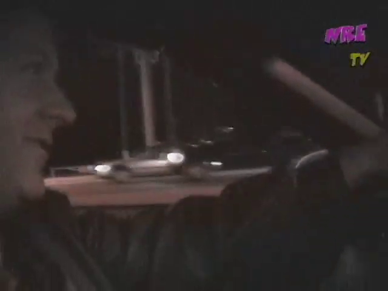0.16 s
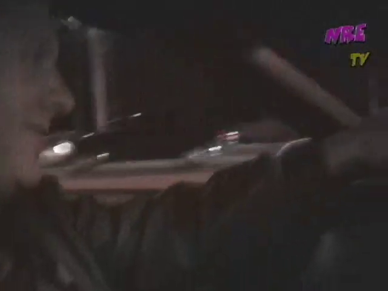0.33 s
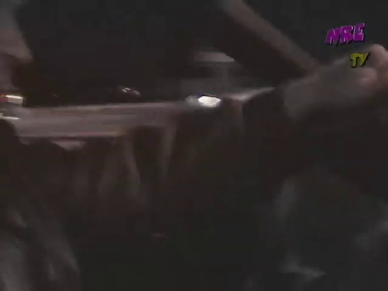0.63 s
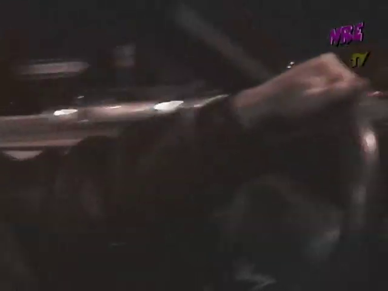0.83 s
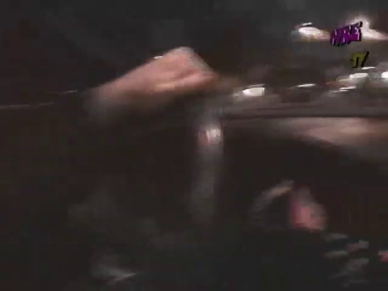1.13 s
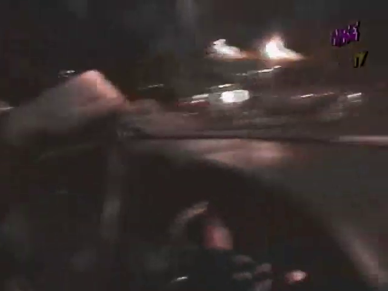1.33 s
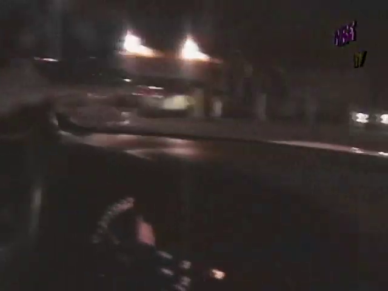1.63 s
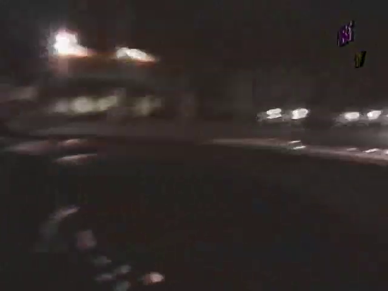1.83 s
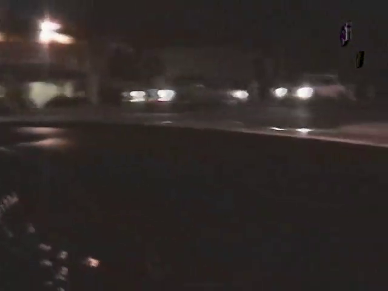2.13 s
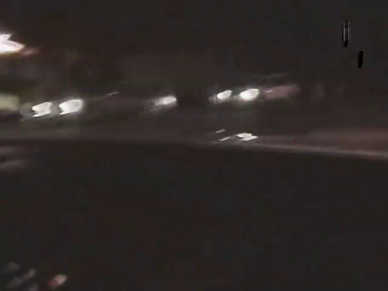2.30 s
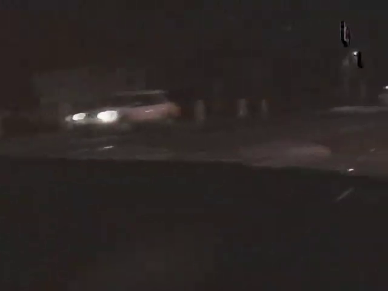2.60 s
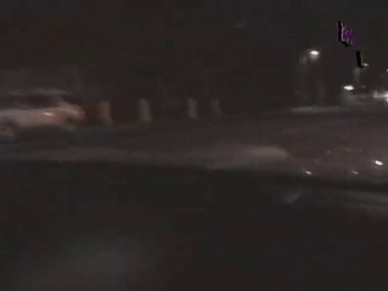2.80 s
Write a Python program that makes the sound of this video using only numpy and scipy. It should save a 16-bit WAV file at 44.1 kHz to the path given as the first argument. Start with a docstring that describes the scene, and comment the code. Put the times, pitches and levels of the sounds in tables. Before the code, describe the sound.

A powerful car engine booms inside the cabin, shuddering briefly, then climbing steadily under hard acceleration.

```python
"""The exhaust of a turbocharged V8 booms inside the cabin as the car pulls hard in one gear.
It is a sum of pure tones locked to the engine: a strong firing note over a lumpy beat of lower tones.
The revs sag and shudder as the drive takes up, then climb. Gear whine is made of tones that climb with them.
Shaped noise makes the intake rush and turbo air, which throb with the engine, and the steadier road noise.
Narrow bands of wavering tone make breathy whistles that come and go."""
import sys
import numpy as np
from scipy import signal
from scipy.fft import rfft, irfft, next_fast_len
from scipy.io import wavfile
from scipy.ndimage import uniform_filter1d, minimum_filter1d

SR = 44100
rng = np.random.default_rng(int(sys.argv[2]) if len(sys.argv) > 2 else 0)


def put_to_file(sound):
    """Save the sound as 16-bit audio at rate SR, in the file named by the first command-line argument."""
    columns = np.atleast_2d(sound).T  # one column per channel
    safe = np.clip(columns, -1, 1)
    whole_steps = np.round(safe * 32767)
    wavfile.write(sys.argv[1], SR, whole_steps.astype(np.int16))


N = 130095  # length in samples

# Engine speed, counted in cylinder firings: time_s, firing_hz
FIRING_SPEED = [(0.0, 151.7), (0.1, 149.7), (0.18, 142.1), (0.26, 122.7), (0.37, 134.3), (0.48, 133.3),
                (0.65, 136.7), (0.87, 143.7), (1.2, 153.8), (1.5, 163), (1.8, 172.4), (2.1, 180.4),
                (2.4, 190.4), (2.7, 197.5), (2.95, 203.3)]
CYLINDERS = 8
START_CYCLE = 0.72  # share of an engine cycle already done at the start
SPEED_JITTER, SPEED_JITTER_HZ = 0.00034, 13.8  # size as a share of speed, and how fast it moves
# How strongly the engine shudders while the drive takes up: time_s, amount (0 to 1)
SHUDDER = [(0, 1), (.2, 0.87), (.3, 0.24), (.45, 0), (.8, 0.02)]

# Exhaust tones, each a whole multiple of the engine cycle rate:
# multiple, level_db (at REFERENCE_HZ), slope_db_per_octave (of speed), shudder_db (added at full shudder)
EXHAUST_TONES = [(2, -30, 38, -7), (3, -33.5, 22.5, 19), (4, -18, 5, 6.5), (5, -19.5, 15, -12.5),
                 (6, -17, -3, 3), (7, -47, 19.5, 2), (8, -9, -12, -6), (9, -37, -21.5, 16.5),
                 (10, -31, -11, -43), (11, -40.5, -29, 6), (12, -45.5, -9, -13), (13, -33.5, 13.5, 1.5),
                 (14, -75, 2, -9), (15, -46.5, -31, 0), (17, -45.5, -34, 7), (21, -44, 23, -10),
                 (24, -48, -20, -13), (25, -42.5, 0, 10.5)]
REFERENCE_HZ = 160.6  # firing rate
# How the cabin colours the exhaust tones: pitch_hz, gain_db
CABIN = [(30, -8), (60, 2), (95, 0.5), (115, 4), (135, -0.5), (155, 2.5), (172, .5), (200, -3),
         (217, -12.5), (243, 5), (270, 0), (308, 5), (330, -2), (400, -4), (600, -4)]
BOOM_HZ, BOOM_WIDTH_HZ = 100, 40  # cabin resonance that shifts the timing of the tones
# Overall change to the exhaust tones, with one brief dip near the start: time_s, gain_db
EXHAUST_GAIN = [(0, -0.5), (.035, -0.5), (.07, -11.5), (.105, 2), (.135, -0.5), (.19, 1.5), (.3, -1),
                (.42, 1.4), (1, -1), (2, -.5), (2.95, 1.5)]
# The tone an octave above the firing note: time_s, level_db
OCTAVE_LEVEL = [(0, -39), (.6, -33.5), (.9, -44), (1.25, -31.5), (1.55, -25.5), (1.8, -38.5), (2.15, -43),
                (2.6, -35.5), (2.95, -35)]
# Uneven combustion: waver as a share of each tone, the extra at full shudder, and its rate
UNEVEN, SHUDDER_UNEVEN, UNEVEN_HZ = 0.097, 0.47, 27

# Gear whine tones, as multiples of the firing rate
LOW_WHINE_MULTIPLE, HIGH_WHINE_MULTIPLE, TOP_WHINE_MULTIPLE = 8, 24, 32
# Low whine: time_s, level_db
LOW_WHINE = [(0, -48), (.22, -41), (.45, -39.5), (.57, -40), (.78, -42), (.87, -30), (1.04, -37.5),
             (1.26, -26.5), (1.45, -31), (1.55, -43), (1.85, -40), (2.03, -36), (2.5, -36.5), (2.68, -52),
             (2.95, -39)]
# High whine: time_s, level_db
HIGH_WHINE = [(0, -66), (.6, -60), (.71, -49), (1.1, -45.5), (1.65, -49), (1.82, -38.5), (1.95, -34),
              (2.14, -44), (2.4, -42), (2.52, -36), (2.69, -35), (2.8, -41.5), (2.95, -47)]
TOP_WHINE_DB = -61
WHINE_FLUTTER, WHINE_FLUTTER_HZ = 0.37, 45  # share of the loudness, and its rate
WHINE_WANDER_RAD = 0.89  # phase wander of the high whine

# Intake rush before INTAKE_DB is added: time_s, level_db
INTAKE_LEVEL = [(0, -40.5), (.16, -38), (.22, -36), (.3, -43.5), (.43, -37.5), (.75, -39), (1.08, -36.5),
                (1.3, -34), (1.56, -31), (1.9, -32), (2.2, -34), (2.66, -33.5), (2.95, -31)]
# Turbo air before TURBO_DB is added: time_s, level_db
TURBO_LEVEL = [(0, -57), (.22, -54.5), (.31, -61), (.43, -54.5), (.6, -56.5), (1.1, -55.5), (1.54, -53),
               (2.2, -52), (2.95, -50)]
INTAKE_DB, TURBO_DB = 3, 10
# Tone colour of the intake rush: pitch_hz, relative_level_db (per Hz)
INTAKE_SPECTRUM = [(600, -19), (920, -17.5), (1020, -3), (1300, 1.5), (1600, -1.5), (2100, -1.5),
                   (2500, -5), (2900, -10.5), (3600, -20.5), (6000, -52)]
# Tone colour of the turbo air: pitch_hz, relative_level_db (per Hz)
TURBO_SPECTRUM = [(1800, -53), (2800, -2), (3600, 5.5), (4200, 2.5), (4850, -1), (5350, -4.5), (5900, -1),
                  (6500, -9), (7300, -20), (9000, -45)]
# Panel and duct resonances in both: pitch_hz, width_hz, boost_db
PANELS = [(1016, 24, 6.5), (1163, 17, 4), (1277, 50, 1.5), (1490, 57, 4), (1752, 19, 10.5), (1960, 17, 7.5),
          (2270, 30, 1.5), (2372, 28, 8), (3250, 38, 5), (4280, 120, 5), (4730, 130, 4), (5330, 60, 8)]
THROB = 0.16  # loudness swing, as a share, once each engine cycle

# Breathy whistles: pitch_hz, waver_rate_hz, centre_s, length_s (spread of the swell), peak_db
WHISTLES = [(1033, 41, 0.226, 0.027, -35.5), (1037, 45, 0.486, .025, -36), (1275, 60, 0.48, 0.28, -38.5),
            (1250, 49, 0.653, .02, -33.5), (4880, 180, 1.58, 0.28, -45), (1910, 25, 1.4, 0.23, -43.5),
            (3230, 70, 1.8, .3, -44.5), (1163, 33, 2.55, .35, -38), (638.5, 38, 2.17, .7, -40.5)]

# Low jolting of the body: time_s, level_db
JOLT_LEVEL = [(0, -29.5), (.25, -34), (.55, -33), (.8, -35.5), (1.1, -45)]
# Tone colour of the jolting: pitch_hz, relative_level_db (per Hz)
JOLT_SPECTRUM = [(20, -21), (40, -8), (60, 3), (120, 4.5), (170, 6), (210, -11.5), (250, 3), (300, 8),
                 (350, -11), (460, -10.5), (600, -35.5)]
# Body rumble: time_s, level_db
RUMBLE_LEVEL = [(0, -23.5), (1, -28.5), (1.5, -29.5), (2, -37), (2.5, -29), (2.95, -27)]
# Tone colour of the rumble: pitch_hz, relative_level_db (per Hz)
RUMBLE_SPECTRUM = [(15, -20), (30, -4), (50, 1), (80, -5.5), (150, -9.5), (205, -5), (250, -10.5),
                   (310, -9), (380, -28.5), (550, -60.5)]
# Tyre roar: time_s, level_db
TYRE_LEVEL = [(0.03, -34.5), (0.05, -31), (0.61, -35.5), (1.36, -35.5), (1.41, -32.5), (2.8, -28.5),
              (2.9, -26), (2.92, -26.5)]
# Tone colour of the tyre roar: pitch_hz, relative_level_db (per Hz)
TYRE_SPECTRUM = [(200, -26), (340, 5), (420, 1), (570, -1), (640, 3), (700, 0), (820, -0.5), (940, -5),
                 (1150, -9.5), (1500, -39)]
# Air hiss before HISS_DB is added: time_s, level_db
HISS_LEVEL = [(0, -59), (.2, -57), (.31, -60.5), (.43, -62.5), (1.1, -55), (1.8, -52), (2.25, -47.5),
              (2.95, -46.5)]
# Tone colour of the hiss: pitch_hz, relative_level_db (per Hz)
HISS_SPECTRUM = [(5500, -41), (7400, -15), (8000, 0), (8500, 2.5), (9900, 3.5), (11000, -9.5), (12500, -10),
                 (15200, -41)]
# Tone colour of the extra top of the hiss: pitch_hz, relative_level_db (per Hz)
TOP_HISS_SPECTRUM = [(8000, -24), (10500, 8), (12400, 0), (13800, -12), (15000, -26)]
HISS_DB, TOP_HISS_DB = -3.5, -6
TOP_HISS_GROWTH = 1.1  # dB of change in the top for each dB of change in the hiss

# Stereo: level of the left-right difference against the middle
EXHAUST_SIDE_DB, RUMBLE_SIDE_DB, AIR_SIDE_DB, HISS_SIDE_DB = -23.5, -11, -14.5, 2.5
AIR_PAN_DB = 0.23  # all but the exhaust: left up, right down by this much

LIMIT_TOP, LIMIT_S = 0.95, 0.012  # highest peak and smoothing time of the limiter
CUTOFF_HZ = 16000


def exhaust(firing_hz, cycle):
    """Tones locked to the engine, coloured by the cabin; uneven combustion makes all but the octave waver."""
    shudder = np.clip(in_time(SHUDDER), 0, 1)
    octaves = np.log2(firing_hz / REFERENCE_HZ)
    shared_db = in_time(EXHAUST_GAIN)
    waver_size = UNEVEN + SHUDDER_UNEVEN * shudder
    out = from_db(in_time(OCTAVE_LEVEL)) * np.cos(2 * CYLINDERS * cycle)
    for multiple, level_db, slope_db, shudder_db in EXHAUST_TONES:
        hz = multiple * firing_hz / CYLINDERS
        tone_db = level_db + slope_db * octaves + shudder_db * shudder
        gain = from_db(shared_db + tone_db + at_hz(CABIN, hz))
        # a tone lags more as it climbs past the cabin resonance
        lag = np.arctan(2 * (hz - BOOM_HZ) / BOOM_WIDTH_HZ) + np.pi / 2
        # a complex waver moves both loudness and phase
        random_motion = (drift(UNEVEN_HZ) + 1j * drift(UNEVEN_HZ)) / np.sqrt(2)
        waver = 1 + waver_size * random_motion
        out = out - gain * np.real(waver * np.exp(1j * (multiple * cycle - lag)))
    return out * (1 + from_db(EXHAUST_SIDE_DB) * np.array([[-1], [1]]))


def gear_whine(cycle):
    """Thin tones from meshing gear teeth climb with the engine and flutter at random; higher ones wander more
    in phase."""
    tones = (
        (LOW_WHINE_MULTIPLE, in_time(LOW_WHINE)),
        (HIGH_WHINE_MULTIPLE, in_time(HIGH_WHINE)),
        (TOP_WHINE_MULTIPLE, TOP_WHINE_DB),
    )
    wander = WHINE_WANDER_RAD * drift(WHINE_FLUTTER_HZ) / HIGH_WHINE_MULTIPLE
    out = 0
    for multiple, level_db in tones:
        flutter = 1 + WHINE_FLUTTER * drift(WHINE_FLUTTER_HZ)
        out = out + from_db(level_db) * flutter * np.sin(multiple * (CYLINDERS * cycle + wander))
    return out


def boost(cycle):
    """Rushing intake and turbo air is noise that rings at panel resonances and pulses once each engine cycle."""
    intake = from_db(INTAKE_DB + in_time(INTAKE_LEVEL)) * noise(INTAKE_SPECTRUM, AIR_SIDE_DB, PANELS)
    turbo = from_db(TURBO_DB + in_time(TURBO_LEVEL)) * noise(TURBO_SPECTRUM, AIR_SIDE_DB, PANELS)
    return (intake + turbo) * (1 + THROB * np.cos(cycle))


def whistles():
    """Random waver spreads each fixed pitch into a narrow, breathy band that swells and fades."""
    t = np.arange(N) / SR
    out = 0
    for hz, waver_hz, centre, length, peak_db in WHISTLES:
        phase = 2 * np.pi * hz * t
        tone = drift(waver_hz) * np.cos(phase) + drift(waver_hz) * np.sin(phase)
        swell = np.exp(-((t - centre) / length) ** 2 / 2)
        out = out + from_db(peak_db) * swell * tone
    return out


def road():
    """Jolts, body rumble, tyre roar and air are shaped noises; the hiss is wide and brightens as it grows."""
    jolt = from_db(in_time(JOLT_LEVEL)) * noise(JOLT_SPECTRUM, RUMBLE_SIDE_DB)
    rumble = from_db(in_time(RUMBLE_LEVEL)) * noise(RUMBLE_SPECTRUM, RUMBLE_SIDE_DB)
    tyres = from_db(in_time(TYRE_LEVEL)) * noise(TYRE_SPECTRUM, AIR_SIDE_DB)
    hiss_db = HISS_DB + in_time(HISS_LEVEL)
    hiss = from_db(hiss_db) * noise(HISS_SPECTRUM, HISS_SIDE_DB)
    average_db = hiss_db.mean()
    top_db = TOP_HISS_DB + average_db + TOP_HISS_GROWTH * (hiss_db - average_db)
    top_hiss = from_db(top_db) * noise(TOP_HISS_SPECTRUM, AIR_SIDE_DB)
    return jolt + rumble + tyres + hiss + top_hiss


def noise(spectrum, side_db, peaks=()):
    """Stereo noise with a given tone colour, width and resonances; the middle has an rms of one."""
    size = next_fast_len(N)
    hz = np.arange(size // 2 + 1) * SR / size
    db = at_hz(spectrum, hz)
    for peak_hz, width, boost_db in peaks:
        db = db + boost_db / (1 + (2 * (hz - peak_hz) / width) ** 2)
    white = rng.standard_normal((2, size))
    mid, side = irfft(rfft(white) * from_db(db), size)[:, :N]
    return rms_one(mid) + from_db(side_db) * rms_one(side) * np.array([[1], [-1]])


def drift(rate_hz):
    """Smooth random motion with an rms of one, made at a fortieth of the sample rate."""
    r = np.exp(-2 * np.pi * rate_hz * 40 / SR)
    rough = rng.standard_normal(N // 40 + 2002)
    slow = signal.lfilter([1], [1, -2 * r, r * r], rough)[2000:]  # drop the filter's start-up
    return np.interp(np.arange(N) / 40, np.arange(len(slow)), rms_one(slow))


def in_time(rows):
    """Join the points of a table by straight lines, giving a value at every sample."""
    return np.interp(np.arange(N) / SR, *np.transpose(rows))


def at_hz(points, hz):
    """Read a spectrum in dB at given pitches, on a log-pitch axis."""
    point_hz, db = np.transpose(points)
    return np.interp(np.log(np.maximum(hz, 1)), np.log(point_hz), db)


def from_db(db):
    """Turn decibels into gain."""
    return 10 ** (np.asarray(db) / 20)


def rms_one(x):
    """Scale to an rms of one."""
    return x / np.sqrt(np.mean(x ** 2) + 1e-20)


def scene():
    """One engine speed drives the exhaust, the gear whine and the throb of the air."""
    firing_hz = in_time(FIRING_SPEED) * (1 + SPEED_JITTER * drift(SPEED_JITTER_HZ))
    cycle = 2 * np.pi * (START_CYCLE + np.cumsum(firing_hz) / CYLINDERS / SR)  # radians
    others = gear_whine(cycle) + whistles() + boost(cycle) + road()
    pan = from_db(AIR_PAN_DB * np.array([[1], [-1]]))
    return exhaust(firing_hz, cycle) + others * pan


def record(dry):
    """A smooth limiter turns down the loudest peaks, then a steep filter removes the top of the treble."""
    size = int(LIMIT_S * SR)
    gain = LIMIT_TOP / np.maximum(np.abs(dry).max(axis=0), LIMIT_TOP)
    gain = minimum_filter1d(gain, 2 * size + 1)  # turn down ahead of each peak
    gain = uniform_filter1d(uniform_filter1d(gain, size), size)
    treble_cut = signal.cheby2(12, 70, CUTOFF_HZ, fs=SR, output="sos")  # 70 dB down from CUTOFF_HZ up
    return signal.sosfilt(treble_cut, dry * gain)


dry = scene()
out = record(dry)
put_to_file(out)
```